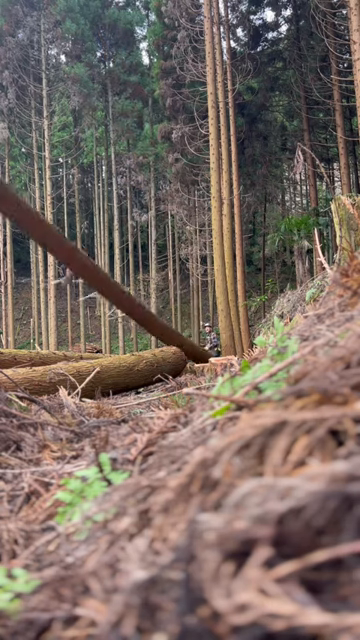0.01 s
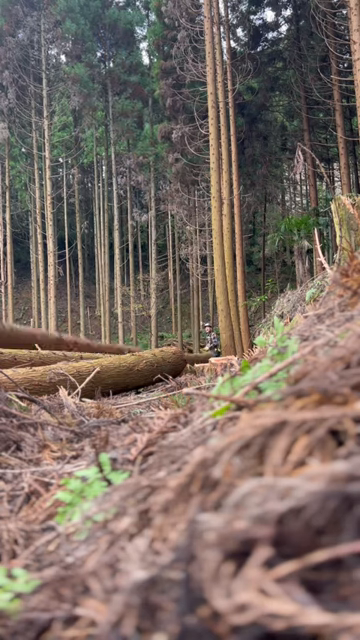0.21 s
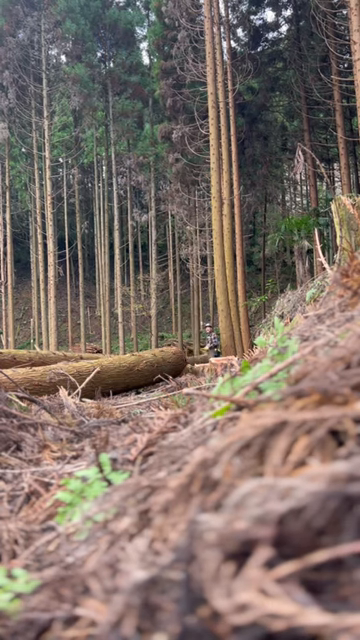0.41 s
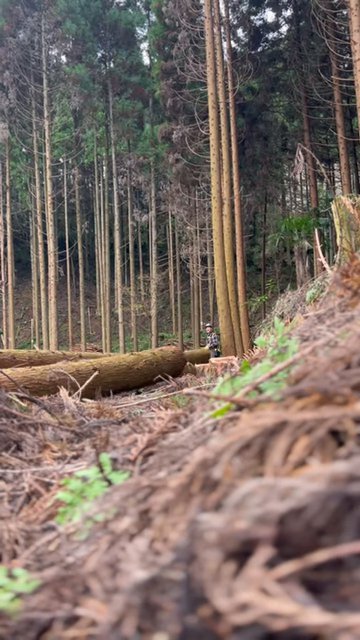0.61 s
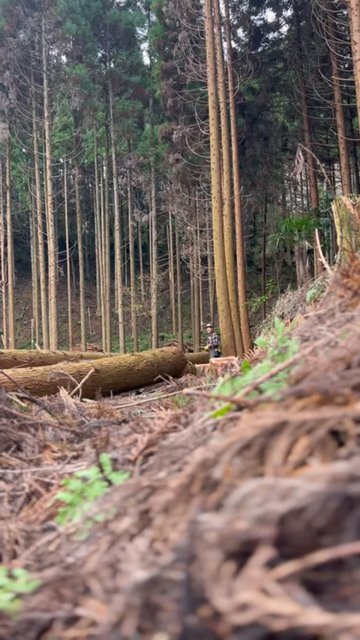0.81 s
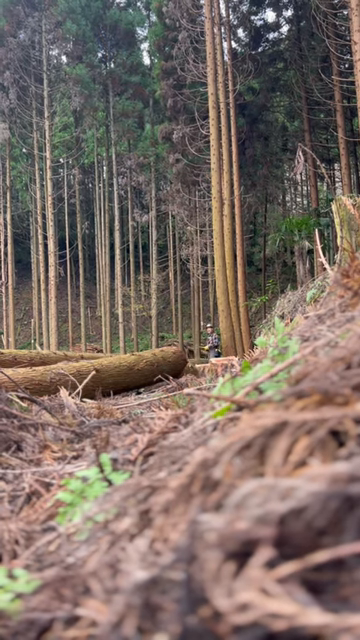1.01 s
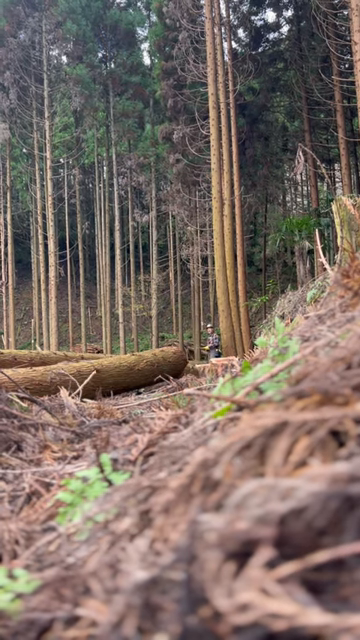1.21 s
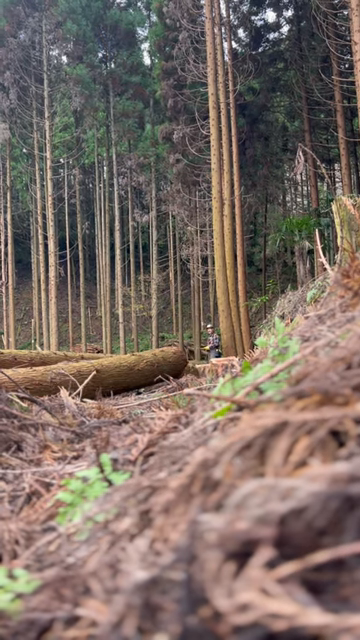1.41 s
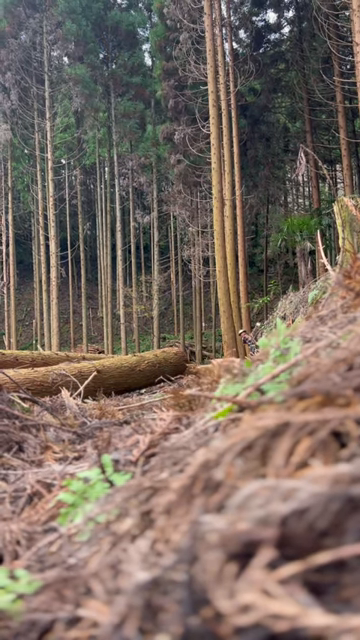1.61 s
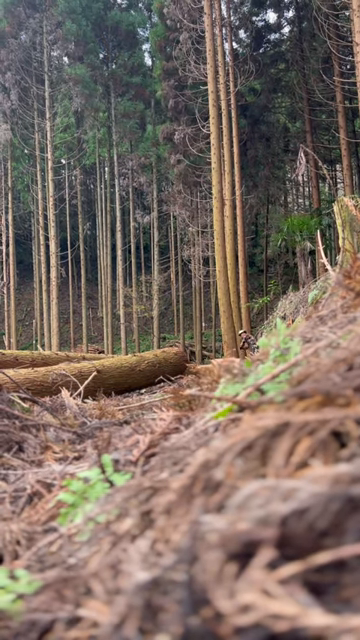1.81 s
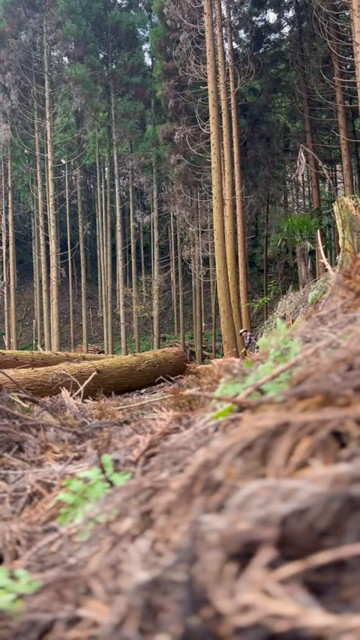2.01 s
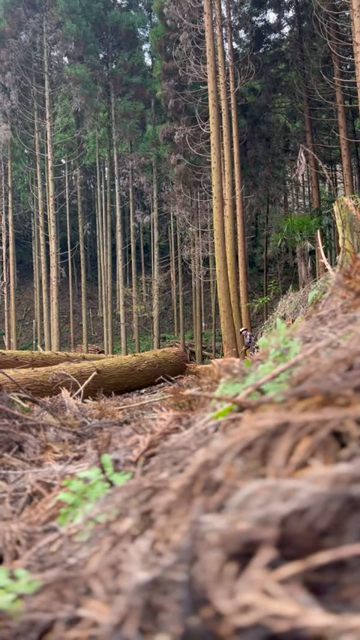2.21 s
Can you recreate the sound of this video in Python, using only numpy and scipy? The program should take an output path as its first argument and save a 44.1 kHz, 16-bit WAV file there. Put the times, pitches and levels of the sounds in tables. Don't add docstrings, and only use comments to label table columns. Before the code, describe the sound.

A felled tree crashes down: twigs tear from 0 s, then the trunk slams onto logs at 0.27-0.45 s with deep rolling thumps, knocking limbs, dense snaps and needle hiss. Smaller bounces, a clear snap at 0.9 s and settling at 1.33 s follow over a distant chainsaw idle. At 1.5 s it cuts to quiet, slower puttering in faint air; near 2 s a boot cracks a stick, thuds and brushes slash until 2.3 s.

```python
import sys
import numpy as np
from scipy import signal
from scipy.fft import rfft, irfft, next_fast_len
from scipy.io import wavfile
from scipy.ndimage import uniform_filter1d, map_coordinates

SR = 44100
rng = np.random.default_rng(int(sys.argv[2]) if len(sys.argv) > 2 else 0)


def how_loud(loudness_db):
    steps = np.asarray(loudness_db, float) / 20
    return 10 ** steps


def dump(signal):
    limited = np.clip(np.atleast_2d(signal).T, -1, 1)
    pcm = np.round(limited * 32767).astype(np.int16)
    wavfile.write(sys.argv[1], SR, pcm)


N = 101430


def unit(x):
    return x / np.sqrt(np.mean(x ** 2) + 1e-20)


def along(points, hz):
    f, v = np.transpose(points)
    return np.interp(np.log(hz + 1), np.log(f + 1), v)


def curves(rows):
    s, *cols = np.transpose(rows)
    return [np.interp(np.arange(N) / SR, s, c) for c in cols]


def wobble(rate):
    knots = rng.standard_normal(int(N * 400 / SR) + 4)
    return map_coordinates(knots, [np.arange(N) * rate / SR])


def filtered(x, response):
    m = next_fast_len(x.shape[-1] + 8192)
    return irfft(rfft(x, m) * response(np.fft.rfftfreq(m, 1 / SR)), m)[..., :x.shape[-1]]


def hiss(spectrum, patchy_db):
    z = signal.stft(rng.standard_normal((2, N)), nperseg=256)[2]
    patches = uniform_filter1d(rng.standard_normal(z.shape[1:]), size=8, axis=0)
    patches = uniform_filter1d(patches, size=6, axis=1)
    pair = signal.istft(z * how_loud(patchy_db * unit(patches)), nperseg=256)[1][:, :N]
    return unit(filtered(pair, lambda hz: how_loud(along(spectrum, hz))))


def add(out, s, sound):
    i = round(s * SR)
    out[..., i:i + sound.shape[-1]] += sound[..., :max(N - i, 0)]


def resonance(f, centre_hz):
    damping = 1j * f * centre_hz / 2.2
    return (damping / (centre_hz ** 2 - f ** 2 + damping)) ** 2


def snaps(rows, colour, t60):
    out, t = np.zeros((2, N)), np.arange(2048) / SR
    rise_s, ping, overtone, overtone_db = .0012, .3, 1.38, -13.5
    fade = how_loud(-60 * t / t60) * (1 - np.exp(-t / rise_s))
    noises = rng.standard_normal((len(rows), 4, len(t)))
    for (s, db, hz, broad_db), z in zip(rows, noises):
        splinters = (z[:2] + ping * np.sin(2 * np.pi * hz * t)) * fade
        ring = filtered(
            splinters, lambda f: resonance(f, hz) + how_loud(overtone_db) * resonance(f, hz * overtone))
        broad = filtered(z[2:], lambda f: how_loud(along(colour, f))) * fade ** 2
        ring = ring / abs(ring).max()
        broad = broad / abs(broad).max()
        add(out, s, how_loud(db) * (ring + how_loud(broad_db) * broad))
    return out


def thumps(rows, t60, per_hz):
    out, t = np.zeros(N), np.arange(SR // 3) / SR
    sagging_t = t + 0.0012 * (1 - np.exp(-t / 0.024))
    for s, db, hz in rows:
        fade = how_loud(-60 * t / (t60 + per_hz / hz)) * (1 - np.exp(-t / 0.00045))
        add(out, s, how_loud(db) * fade * np.sin(2 * np.pi * hz * sagging_t))
    return out


def crackle(level_db, count):
    u = rng.random((count, 4))
    t = np.arange(160) / SR
    start = (u[:, :1] * (N - 1)).astype(int)
    hz = 1300 * 7 ** u[:, 1:2]
    size = how_loud(-4.0 * np.log(u[:, 2:3] + 0.0038) + level_db[start])
    grains = size * np.sin(2 * np.pi * hz * t) * np.exp(-t * hz / 3.3) * (1 - np.exp(-t * hz / 5.6))
    at = start + np.arange(len(t))

    def laid(g):
        return np.bincount(at.ravel(), g.ravel(), N + len(t))[:N]
    return np.array([laid(grains), laid(grains * (2 * u[:, 3:] - 1))])


# (time [s], level [dB])
TRUNK_FORCE = [(0, -36), (.2, -34), (.262, -28), (.28, -18), (.335, -17), (.4, -14), (.442, -15),
               (.458, -22), (.49, -23), (.512, -30), (.545, -25), (.6, -35), (.69, -30), (1.28, -36),
               (1.335, -30), (1.43, -37), (1.5, -36)]
# (frequency [Hz], level per Hz [dB])
LOG_TONE = [(15, -44), (35, -2.5), (150, 1.5), (300, -5), (480, -10.5), (820, -23.5), (1000, -48.5),
            (2600, -120)]
# (time [s], peak level [dB], pitch [Hz])
BLOWS_AND_KNOCKS = [(.273, -1.5, 224), (.299, 1, 110), (.311, -3, 125), (.362, -2.5, 293), (.408, 0, 151.7),
                    (.42, 0.5, 191), (.478, -8.5, 113), (.524, -13.5, 149), (.704, -11.5, 107), (.719, -9, 60),
                    (.839, -17, 62.6), (1.33, -18, 448), (1.345, -17, 431), (1.375, -20.5, 427),
                    (1.49, -25, 131.8),
                    (.225, -22, 532), (.246, -20.5, 525), (.268, -10.5, 396), (.291, -10.5, 482),
               (.294, -17, 713), (.333, -5.5, 112), (.343, -19, 1120), (.346, -12.5, 520), (.36, -12, 613),
               (.372, -19.5, 777), (.385, -8, 470), (.392, -6, 310), (.402, -7.5, 480), (.406, -23.5, 780),
               (.422, -9.5, 452), (.426, -21, 778), (.436, -3, 230), (.44, -19.5, 670), (.461, -32, 520),
               (.464, -9.5, 99), (.48, -43, 277), (1.065, -25, 269), (1.168, -22.5, 165),
               (1.215, -34.5, 780)]


def trunk():
    force_db, = curves(TRUNK_FORCE)
    lumps = how_loud(1.5 * wobble(69.74))
    roll = how_loud(force_db + 0.5) * unit(lumps * hiss(LOG_TONE, patchy_db=-0.5))
    return roll + thumps(BLOWS_AND_KNOCKS, t60=.04, per_hz=3)


# (time [s], level [dB])
CROWN_SWEEP = [(0, -40), (.17, -35.5), (.235, -32), (.255, -20.5), (.285, -23.5), (.33, -20.5), (.4, -26),
               (.44, -31.5), (.52, -39), (.66, -42), (.69, -38.5), (.9, -43.5), (1.27, -49), (1.33, -42.5),
               (1.42, -45), (1.5, -45.5)]
# (frequency [Hz], level per Hz [dB])
NEEDLE_TONE = [(290, -32), (950, -3.5), (1400, -5), (3000, -0.5), (5000, -6), (8000, -8), (12000, -19),
               (16500, -34)]


def crown():
    sweep_db, = curves(CROWN_SWEEP)
    rustle = how_loud(sweep_db - 2.0 + wobble(26.7)) * hiss(NEEDLE_TONE, patchy_db=2.5)
    top = filtered(rustle, lambda hz: 1 / (1 + (10300 / (hz + 1)) ** 8))
    brighter = how_loud(0.26 * (sweep_db - sweep_db[0])) - 1
    return rustle + top * brighter + crackle(sweep_db - 1.5, count=2500)


# (time [s], peak level [dB], pitch [Hz], broad crack
# [dB])
BRANCH_SNAPS = [(0.167, -32.5, 2090, 11.5), (0.19, -27.5, 1550, 12), (0.2066, -18, 3170, 8.5),
                (0.2092, -15, 6780, -10), (0.2478, -14, 2010, -0.5), (0.2534, -16.5, 1740, 8),
                (0.2697, -10.5, 3190, -13), (0.3479, -20.5, 2740, -2.5), (0.373, -24, 1630, 14),
                (0.4496, -17.5, 3250, 8.5), (0.4637, -18.5, 3217, -0.5), (0.541, -26, 1515, -19),
                (0.564, -19.5, 2740, -9),
                (0.67, -33.5, 1370, 5), (0.6851, -31.5, 1650, 12), (0.748, -26.5, 2800, -18),
              (0.9033, -13.5, 1723, -43), (0.9885, -29, 4090, 4.5), (1.0413, -31, 1620, -26),
              (1.08, -35, 1490, -21), (1.13, -28.5, 2160, -8), (1.13, -30.5, 1204, -27),
              (1.1884, -31, 1730, -35.5), (1.3087, -25, 3010, -5), (1.3211, -27.5, 1885, -28),
              (1.3466, -24.5, 1930, -2), (1.47, -34, 1920, 7),
                (0.045, -24.5, 6800, -30),
    (0.4771, -29.5, 7000, 11.5),
    (0.687, -34, 8700, 2),
    (0.835, -35, 7800, 11.5),
    (1.496, -35, 9400, 1),
                (.2545, -13, 3400, -23), (0.2526, -13.5, 8600, -9), (0.258, -18.5, 1570, -12),
               (.285, -18, 2070, -18), (0.2956, -14.5, 1550, 0), (.297, -16, 9130, -15),
               (0.32, -10.5, 7800, -6), (.389, -31, 1900, -17), (.487, -29, 7500, -9),
               (0.491, -34, 3200, -20), (.501, -33, 3230, -22), (.506, -47, 2970, -18),
               (0.5346, -24, 3200, -23), (0.538, -24, 2330, -2), (0.546, -25.5, 1270, -20),
               (0.566, -23, 5930, -24), (.62, -32.5, 8500, -10), (0.644, -35, 6000, 2),
               (.9045, -21.5, 2916, -42), (0.99, -29, 7310, -16), (1.0442, -28.5, 3150, -30),
               (1.054, -32, 1510, -2.5), (1.0792, -36, 2900, -7), (1.09, -39, 1515, -25),
               (1.1565, -38, 3020, -27), (1.3226, -32, 2600, 6.5), (1.4175, -40, 2770, -9)]


def branches():
    rows = BRANCH_SNAPS
    return snaps(rows, NEEDLE_TONE, t60=0.02)


# (time [s], peak level [dB], pitch [Hz], broad crack [dB])
STICK_SNAPS = [
    (1.9855, -18.5, 6010, 5.5),
    (1.9885, -19.5, 1745, 8.5),
    (1.994, -23, 1450, -31),
    (2.002, -19, 1256, -36),
    (2.01, -42, 1170, -41),
    (2.019, -29, 6240, -3),
]
# (time [s], peak level [dB], pitch [Hz])
SOLE_THUDS = [
    (1.99, -26.5, 603),
    (1.992, -21.5, 145),
    (1.992, -29, 310),
    (2.008, -18, 82.8),
    (2.012, -31.5, 457),
    (2.03, -26.5, 383),
]
# (time [s], level [dB])
SLASH_SWEEP = [(1.985, -90), (2.0, -49), (2.035, -45.5), (2.07, -39.5), (2.1, -38), (2.15, -44),
               (2.19, -49.5), (2.23, -55.5), (2.27, -49.5), (2.3, -51)]
# (frequency [Hz], level per Hz [dB])
SLASH_TONE = [(290, -57), (650, -7.5), (1000, -15), (1800, -1), (2600, -4.5), (3500, -9.5), (4500, -12.5),
              (5800, -11), (9700, -33), (13000, -65)]


def boot():
    sweep_db, = curves(SLASH_SWEEP)
    muffle_hz = 8500
    crack = snaps(STICK_SNAPS, SLASH_TONE, t60=0.031)
    crack = filtered(crack, lambda hz: (1 + 1j * hz / muffle_hz) ** -4.0)
    ticks = crackle(sweep_db - 5, count=6000)
    ticks = filtered(ticks, lambda hz: (1 + 1j * hz / muffle_hz) ** -2.0)
    brush = how_loud(sweep_db + 1.34 * wobble(60.68)) * hiss(SLASH_TONE, patchy_db=1.5)
    return crack + thumps(SOLE_THUDS, t60=.05, per_hz=13) + ticks + brush


# (multiple [1], level [dB])
FIRING_ORDERS = [(1, 2), (2, -8), (3, -8), (4, -7.5), (5, -10), (6, -14), (7, -17), (8, -17.5), (9, -19.5),
                 (10, -36), (11, -27), (12, -23.5), (13, -32.5)]
# (frequency [Hz], level per Hz [dB])
MUFFLER_TONE = [(35, -40.5), (70, -28), (120, 1.5), (214, -2.5), (408, -8), (600, -33.5), (900, -61),
                (1800, -120)]


def saw(rate, level_db, fall_db):
    turn = 2 * np.pi * np.cumsum(rate * (1 + 0.0027 * wobble(30))) / SR
    lines = np.zeros(N)
    for k, db in FIRING_ORDERS:
        scatter_db = 3 * min(k / 3, 1) * wobble(10)
        level = how_loud(db + fall_db * (k > 1) + scatter_db)
        lines += level * np.sin(k * turn + 0.118 * k * k)
    puff = (1 + np.cos(turn)) ** 2 / 2 * hiss(MUFFLER_TONE, patchy_db=5)
    return how_loud(level_db) * (np.sqrt(2) * lines + how_loud(-6) * puff)


# (time [s], firings per second [Hz], level [dB])
FAST_IDLE = [(0, 63.5, -33.5), (.3, 50, -34.5), (.8, 61, -34.5), (1, 63, -39), (1.5, 56.2, -36)]


def fast_idle():
    rate, level_db = curves(FAST_IDLE)
    return saw(rate, level_db, fall_db=-7.5)


# (time [s], firings per second [Hz])
SLOW_IDLE = [(1.5, 42.7), (1.65, 39.5), (1.8, 38.5), (1.97, 41.3), (2.15, 42), (2.3, 42)]
# (time [s], peak level [dB])
FULL_FIRINGS = [
    (1.608, -27),
    (1.723, -26.5),
    (1.831, -32),
    (1.93, -33),
    (2.249, -26.5),
]


def slow_idle():
    rate, = curves(SLOW_IDLE)
    beats = thumps([(s, db, 94) for s, db in FULL_FIRINGS], t60=0.03, per_hz=1.1)
    return saw(rate, -40.5, fall_db=0) + beats


# (frequency [Hz], level per Hz [dB])
AIR_TONE = [(350, -33), (600, -8.5), (1120, -11.5), (2410, -6), (5180, -12), (5590, -6), (12000, -35),
            (15600, -81.5), (22000, -120)]


def air():
    return how_loud(-61 + wobble(24.5)) * hiss(AIR_TONE, patchy_db=0.5)


def forest(x):
    t60, dull_hz, level_db = .3, 5000, -15
    t = np.arange(SR // 2) / SR
    tail = rng.standard_normal((2, len(t))) * how_loud(-60 * t / t60)
    tail = filtered(tail, lambda f: 1 / (1 + 1j * f / dull_hz))
    tail = tail / np.linalg.norm(tail[0])
    return x + how_loud(level_db) * signal.fftconvolve(x, tail, axes=1)[:, :N]


def scene():
    fall = forest(trunk() + crown() + branches()) + fast_idle()
    calm = forest(boot()) + slow_idle() + air()
    change_s = 1.501
    return np.where(np.arange(N) < change_s * SR, fall, calm)


def roll_off(x):
    return signal.sosfilt(signal.butter(12, 16670, fs=SR, output="sos"), x)


# (frequency [Hz], side under mid [dB])
SIDE_LEVEL = [(60, -33), (180, -22), (350, -9), (600, -1), (1650, -2.5), (4970, 0), (15000, 0)]
# (frequency [Hz], phase [rad])
SIDE_TURN = [(200, -1.92), (2500, -0.97), (6000, -1.5)]
# (frequency [Hz], share [1])
DIRECT_SHARE = [(300, .85), (1400, .8), (2800, .55), (8000, .7)]


def record(dry):
    def ports(hz):
        share = np.clip(along(DIRECT_SHARE, hz), 0, 1)
        direct = share * np.exp(1j * along(SIDE_TURN, hz))
        return how_loud(along(SIDE_LEVEL, hz)) * np.array([direct, np.sqrt(1 - share ** 2)])

    def passband(hz):
        return (hz < 15850) * (1j * hz / (22 + 1j * hz)) ** 2
    side = filtered(dry, ports).sum(axis=0)
    pair = np.array([dry[0] + side, dry[0] - side])
    ceiling = .8
    squeezed = pair / (1 + abs(pair / ceiling) ** 4) ** (1 / 4)
    return roll_off(filtered(squeezed, passband))


dry = scene()
out = record(dry)
dump(out)
```